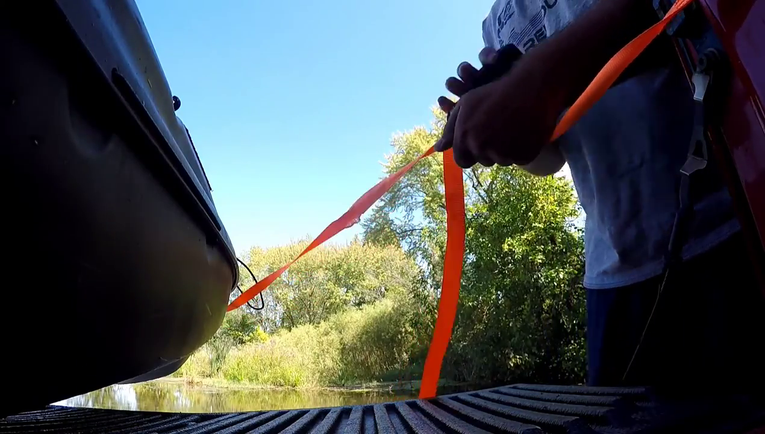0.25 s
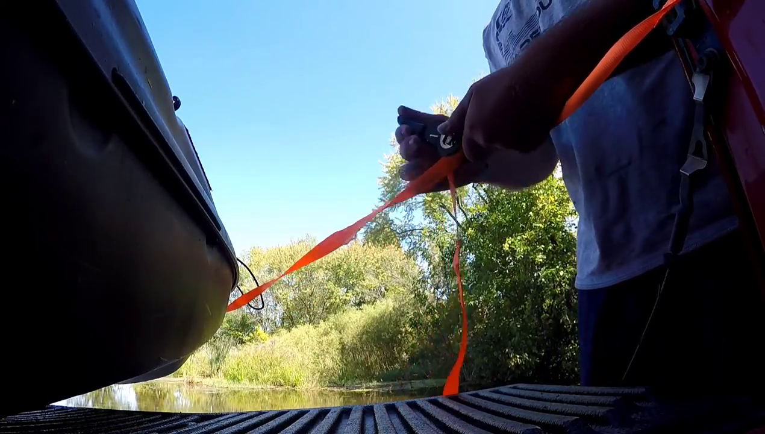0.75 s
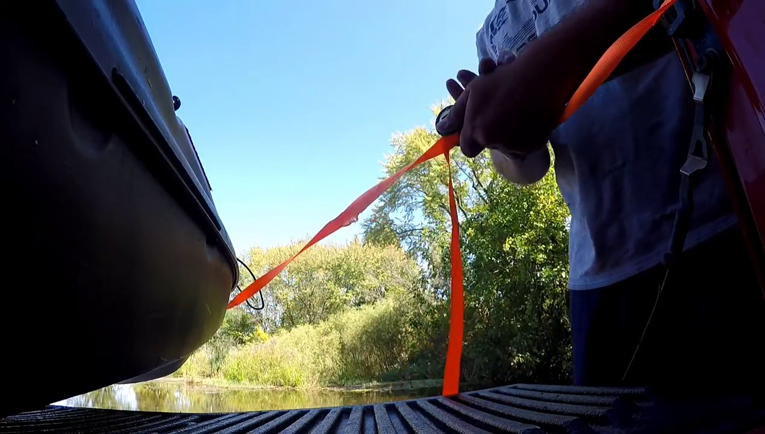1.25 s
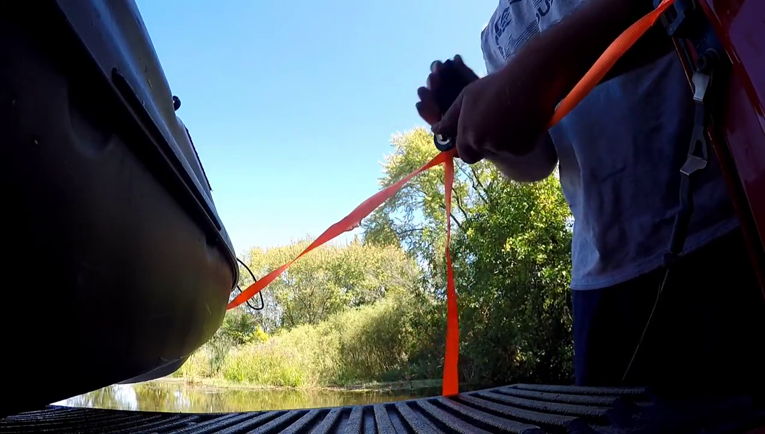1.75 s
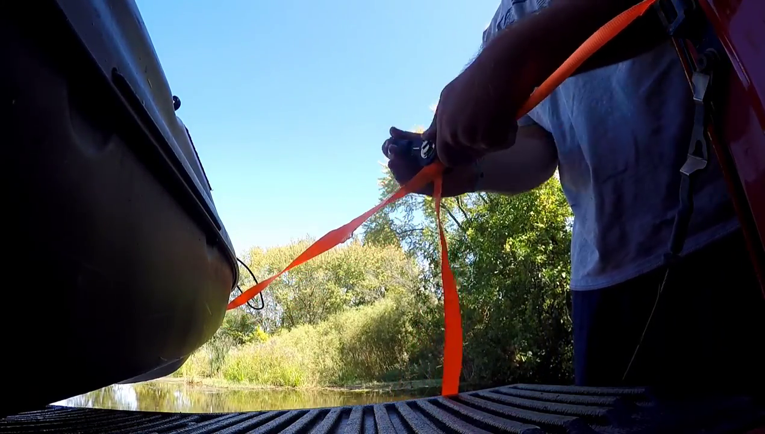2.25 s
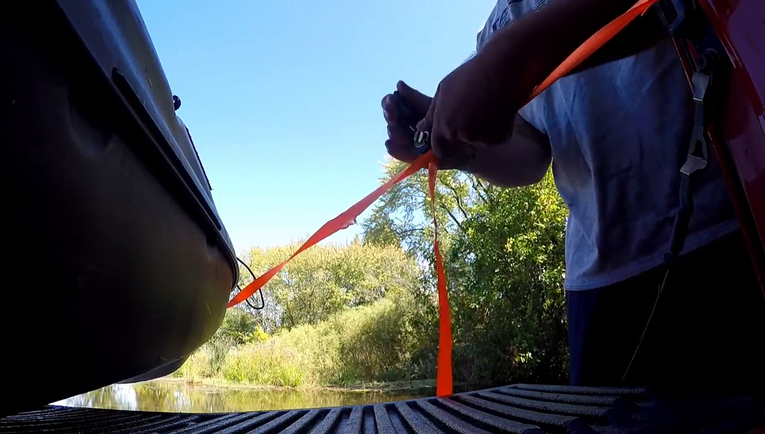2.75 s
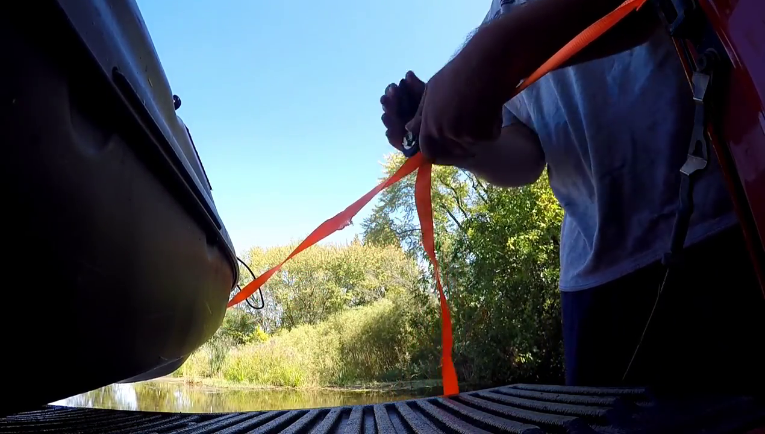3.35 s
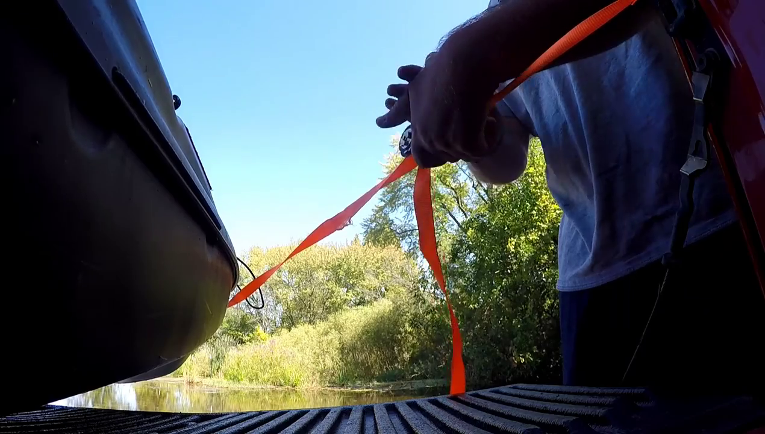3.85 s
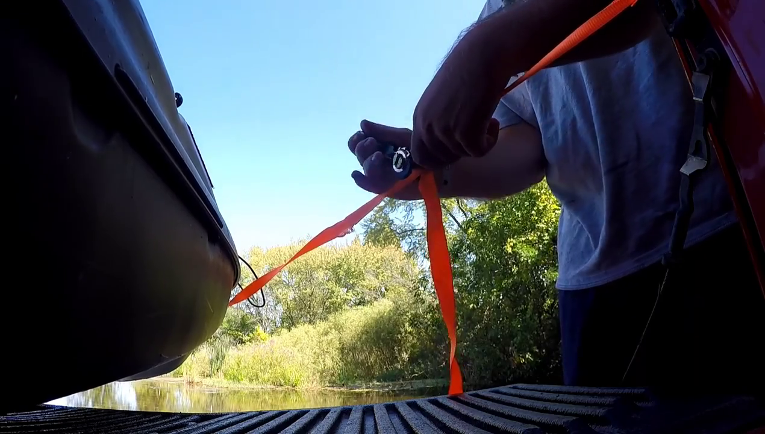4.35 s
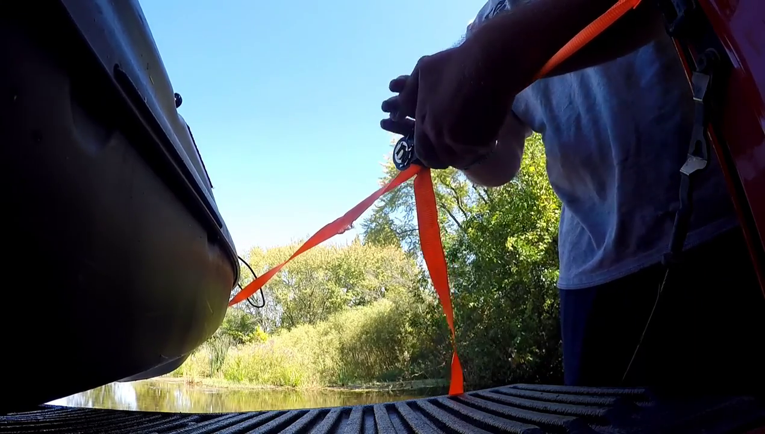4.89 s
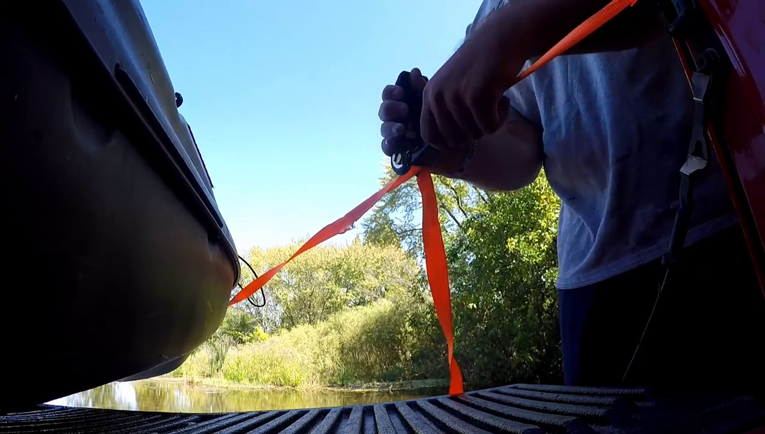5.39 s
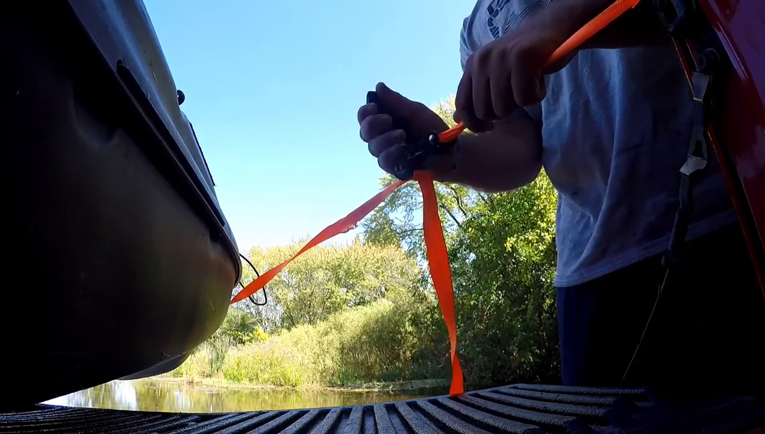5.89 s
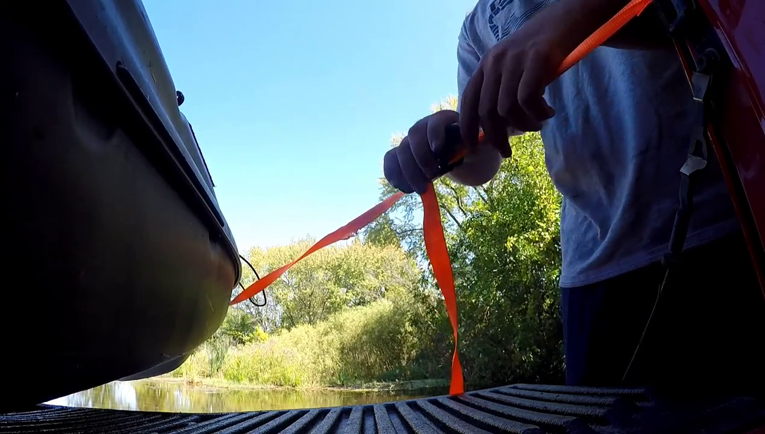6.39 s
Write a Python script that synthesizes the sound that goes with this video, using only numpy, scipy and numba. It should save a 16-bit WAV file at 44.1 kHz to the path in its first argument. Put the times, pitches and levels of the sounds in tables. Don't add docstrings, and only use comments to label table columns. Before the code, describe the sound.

A steel ratchet buckle is cranked in sharp paired and tripled clicks, with boomy knocks and webbing scrapes, over crickets, road hum and a distant truck.

```python
import sys
import numpy as np
from scipy import signal
from scipy.fft import rfft, irfft, next_fast_len
from scipy.io import wavfile
from scipy.ndimage import uniform_filter1d
from numba import njit

SR = 44100
rng = np.random.default_rng(int(sys.argv[2]) if len(sys.argv) > 2 else 0)


def convert_level_to_amplitude(level_db):
    exponent = np.asarray(level_db, float) / 20
    return 10 ** exponent


def inscribe(sig):
    pcm = np.round(np.clip(np.atleast_2d(sig).T, -1, 1) * 32767)
    wavfile.write(sys.argv[1], SR, pcm.astype(np.int16))


N = 292250
T = np.arange(N) / SR
M = next_fast_len(N, real=True)
F = np.maximum(np.arange(M // 2 + 1) * SR / M, 1)


def unit(x):
    return x / np.sqrt(np.mean(x ** 2))


def colour(points, hz):
    p = np.array(points, float)
    return np.interp(np.log(hz), np.log(p[:, 0]), p[:, 1])


def filtered(x, points):
    return unit(irfft(rfft(x, M) * convert_level_to_amplitude(colour(points, F)), M)[:N])


def band(hz, width):
    spectrum = rng.standard_normal(len(F)) + 1j * rng.standard_normal(len(F))
    return unit(irfft(spectrum / (1 + (2 * (F - hz) / width) ** 2), M)[:N])


def walk(rate):
    knots = np.repeat(rng.standard_normal(int(7 * rate) + 2), 16)
    smooth = uniform_filter1d(uniform_filter1d(knots, 16), 16)
    return 1.3 * np.interp(T * rate * 16, np.arange(len(smooth)), smooth)


def spaced(low_hz, ratio, count):
    return low_hz * ratio ** ((np.arange(count) + rng.random(count)) / count)


@njit
def modes(z, pole, size):
    y = np.zeros(size)
    for k in range(len(z)):
        v = z[k]
        for i in range(size):
            y[i] += v.imag
            v *= pole[k]
    return y


def ring(hz, db, t60, size, rise, scatter=0.94):
    start = convert_level_to_amplitude(db) * np.exp(2j * np.pi * scatter * rng.random(len(hz)))
    pole = np.exp((2j * np.pi * hz - np.log(1000) / t60) / SR)
    y = modes(start, pole, size) * (1 - np.exp(-np.arange(size) / (rise * SR)))
    return y / np.abs(y).max()


def add(track, s, y):
    i = max(int(s * SR), 0)
    track[i:i + len(y)] += y[:N - i]


# t/s, level/dB, loudest ring f/Hz, pawl touches early by t/ms, bed tug level/dB
PULLS = [(0.6543, -17.5, 4820, 2.6, -44), (.7102, -5, 5800, 9.2, -24.5), (.762, -4.5, 5020, 5.2, -20.5),
         (1.4182, -17, 5190, 3, -38), (1.481, -1.5, 6900, 9.8, -19.5), (1.5441, -4, 6670, 8.2, -19),
         (2.0763, -15, 5360, 2.9, -29.5), (2.129, -6.5, 6980, 14, -22), (2.1864, -6.5, 7700, 4, -20),
         (2.696, -17, 4980, 13, -29), (2.774, -6, 3800, 4, -17), (2.855, -9.5, 3570, 10.5, -19),
         (3.3228, -15.5, 6600, 2.6, -26.5), (3.4202, -4.5, 6940, 6.4, -19), (3.5139, -4, 7040, 7.5, -19.5),
         (4.023, -15.5, 3830, 3.4, -26.5), (4.1655, -5, 3040, 4.1, -17), (4.404, -6.5, 6460, 21, -18),
         (4.4646, -16, 5510, 0.56, -18), (5.1578, -22.5, 4770, 4.4, -31.5), (5.8979, -6.5, 7520, 25, -31)]
RETURNS = [(0.3265, -9, 5120, 2, -44), (0.4334, -20.5, 4700, 2, -35.5), (0.4525, -16, 5800, 2.9, -39),
           (1.1127, -1, 5770, 7.3, -35), (1.157, -3.5, 5060, 3, -42), (1.8198, -4, 6920, 4.8, -40),
           (1.8635, -3.5, 5160, 3, -25), (2.4385, -8.5, 4240, 3, -35), (2.4869, -2.5, 5400, 1.96, -28.5),
           (3.088, -5.5, 7000, 5, -28.5), (3.1314, -7, 6450, 2.3, -27), (3.763, -5, 4690, 3, -44),
           (3.8079, -1.5, 5140, 4.5, -26), (4.823, -5.5, 6570, 7.8, -29.5), (4.872, -3.5, 8490, 1.9, -21),
           (6.2624, -0.5, 6100, 1.8, -22.5), (6.361, -19, 3630, 1.4, -48), (6.39, -14, 5020, 2.6, -25)]
# t/s, level/dB, loudest ring f/Hz
TAPS = [(.1834, -27.5, 4320), (.3637, -29.5, 5700), (.775, -24, 4400), (1.0618, -35, 5900),
        (1.1413, -22, 5860), (1.4246, -23, 3810), (1.749, -31, 4550), (1.792, -27.5, 6600),
        (2.1745, -18, 8100), (2.3722, -24.5, 3600), (2.444, -11.5, 4410), (2.4715, -23, 2800),
        (2.7627, -16, 5760), (2.8596, -8.5, 4970), (3.0471, -35, 6000), (3.1159, -20, 3400),
        (3.403, -19.5, 5710), (3.4923, -17, 6630), (3.6605, -27, 3560), (3.7005, -27, 3700),
        (3.7077, -31, 3580), (3.7683, -17, 5000), (3.788, -29, 4400), (4.1447, -13.5, 4630),
        (4.6675, -33.5, 5800), (5.8875, -12.5, 6900), (6.0294, -31.5, 6530), (6.1317, -36, 4600),
        (6.179, -36, 3960), (6.28, -30, 4720)]


def snaps():
    touch_db, touch_hz, touch_dull_db = -11.5, 6330, -1
    teeth = PULLS + RETURNS
    touches = [(s - early_ms / 1000, db + touch_db, touch_hz, touch_dull_db)
               for s, db, _, early_ms, _ in teeth]
    return [(*row[:3], 0) for row in teeth] + touches + [(*row, 0) for row in TAPS]


# f/Hz, level/dB per Hz
PLATE = [(710, -42), (1200, -6), (2210, -11), (2980, 3), (4400, -0.5), (6870, 1), (7800, -2.5),
         (15500, -7.5)]


def buckle(count=90):
    out = np.zeros(N)
    for s, db, top_hz, edges_db in snaps():
        treble_db = -8.5 + 0.33 * (db + 10.5)
        bass_db = -5.0 - 0.17 * (db + 12.5)
        crowd = spaced(1200, 16000 / 1200, count)
        crowd_db = colour(PLATE, crowd) + 10 * np.log10(crowd / 5000) + 1.8 * rng.standard_normal(count)
        hz = np.r_[crowd, top_hz]
        gain_db = np.r_[crowd_db, 9.0]
        tilt_db = [bass_db + edges_db, 0, 0, treble_db + 6.5 + edges_db]
        gain_db += np.interp(hz, [3540, 4400, 6700, 7500], tilt_db)
        t60 = np.r_[.008 * (5000 / crowd) ** .3, .013]
        snap = ring(hz, gain_db, t60, size=900, rise=0.00034, scatter=0.7)
        add(out, s - .0002, convert_level_to_amplitude(db + 4.0) * snap)
    return out


# start t/s, length t/s, level/dB
DRAGS = [(0.183, 0.051, -66), (0.261, 0.095, -55.5), (.341, .042, -59), (0.512, 0.019, -53.5),
         (0.621, 0.031, -44.5), (1.026, .1, -47), (1.392, .036, -51), (1.716, 0.16, -48.5),
         (2.048, 0.022, -47.5), (2.363, 0.11, -46.5), (2.668, 0.028, -48), (3.01, 0.082, -43),
         (3.657, 0.2, -45), (4.357, .05, -41), (4.735, 0.071, -40), (5.111, .041, -48.5), (5.835, .09, -42),
         (6.227, 0.04, -45), (6.361, .025, -51)]


def drags():
    ride_db, ride_bright_db, ride_max_s, drag_bright_db = -41.5, -10.5, 0.054, -4
    s = np.array(RETURNS)[:, 0]
    rides = [(a + 0.0065, b - a - .008, ride_db, ride_bright_db)
             for a, b in zip(s[2:], s[3:]) if b - a < ride_max_s]
    return [(*row, drag_bright_db) for row in DRAGS] + rides


# t/s, length t/s, from f/Hz, to f/Hz, level/dB
SQUEAK = (5.99, .03, 4300, 5700, -49)


def squeak():
    _, length, from_hz, to_hz, db = SQUEAK
    u = np.arange(int(length * SR)) / (length * SR)
    hz = from_hz + (to_hz - from_hz) * u ** .5
    return convert_level_to_amplitude(db) * np.sin(np.pi * u) * np.sin(2 * np.pi * np.cumsum(hz) / SR)


def rubbing():
    ticks = rng.standard_normal(N) * convert_level_to_amplitude(2.26 * rng.exponential(size=N)) * (rng.random(N) < .017)
    dull = filtered(ticks, [(900, -3), (2000, -4.5), (3000, 0.5), (4000, -2), (6000, -37)])
    bright = filtered(ticks, [(3000, -32), (4600, 6.5), (6500, 4.5), (10000, -9.5), (15500, -24)])
    out = np.zeros(N)
    grip = convert_level_to_amplitude(1.1 * walk(120))
    for s, length, db, bright_db in drags():
        k = slice(int(s * SR), int((s + length) * SR))
        fade = signal.windows.tukey(k.stop - k.start, .3)
        out[k] += convert_level_to_amplitude(db - 0.5) * fade * grip[k] * (dull[k] + convert_level_to_amplitude(bright_db) * bright[k])
    add(out, SQUEAK[0], squeak())
    return out


# f/Hz, level/dB, decay t60/s
BED = [(181.6, 12, 0.51), (275, 3.5, 0.35), (433.8, 3.5, 0.18), (507.5, -2.5, 0.26), (614, -32, 0.22),
       (748.5, 0.5, 0.2), (905, -2, 0.18), (1018, 2.5, 0.2), (1349, 0.5, 0.13), (1710, -6, 0.13),
       (1777, -3, 0.13), (2000, -31, 0.18)]


def knock(boom_db, panel_hz, t60, count=130):
    bed_hz, bed_db, _ = np.array(BED).T
    crowd = spaced(300, 16, count)
    crowd_db = np.interp(np.log2(crowd / 330), [0, 2.7, 4], [-8, -16, -34])
    crowd_db += 11.0 / (1 + (np.log(crowd / panel_hz) / 0.073) ** 2)
    hz = np.r_[bed_hz * (1 + .012 * rng.standard_normal(len(BED))), 135, 200, 218, 250, crowd]
    db = np.r_[bed_db - 3.0, -4, 2, 10, 0, crowd_db] + 2.5 * rng.standard_normal(len(hz))
    low = hz < 320
    high = ~low
    size = int(1.5 * t60 * SR)
    boom = ring(hz[low], db[low], 2.0 * t60, size, rise=0.0024) * np.linspace(1, 0, size)
    panels = ring(hz[high], db[high], t60 * (600 / hz[high]) ** 0.31, size, rise=0.0011)
    return panels + convert_level_to_amplitude(boom_db) * boom


TENSION_S = [
    .7,
    2.8,
    4.3,
    5.8,
    6,
]
BOOM_DB = [-13.5, -2.5, 6, -2.5, 4]
PULL_PANEL_HZ = [488, 706, 1124, 1020, 900]


def tugs():
    late_s, return_panel_hz = 0.00304, 1234
    pulls = [(s + late_s, db, np.interp(s, TENSION_S, PULL_PANEL_HZ)) for s, *_, db in PULLS]
    returns = [(s, db, return_panel_hz) for s, *_, db in RETURNS]
    return [(s, db, np.interp(s, TENSION_S, BOOM_DB), hz) for s, db, hz in pulls + returns]


# t/s, level/dB, boom share level/dB
JUDDER = [
    (5.832, -31, 5),
    (5.844, -20, -15),
    (5.848, -6, -5.5),
    (5.862, -10.5, -1.5),
    (5.878, -17.5, -11),
    (5.888, -10, 0.5),
    (5.919, -11.5, -5.5),
    (5.945, -24.5, 5.5),
    (6.01, -37.5, 15),
]
HULL_HZ = [445, 910, 1710]


def bed():
    out = np.zeros(N)
    for s, db, boom_db, panel_hz in tugs():
        add(out, s, convert_level_to_amplitude(db) * knock(boom_db, panel_hz, 0.25))
    s, db, boom_db = np.transpose(JUDDER)
    for k, hit in enumerate(np.arange(5.832, 6.01, .006)):
        hit += 0.00467 * rng.random()
        blow = knock(np.interp(hit, s, boom_db), HULL_HZ[k % len(HULL_HZ)], 0.097)
        add(out, hit, convert_level_to_amplitude(np.interp(hit, s, db)) * blow)
    return out


def walls(x):
    t = np.arange(3500) / SR
    near = convert_level_to_amplitude(-22 - 60 * t / .018)
    far = convert_level_to_amplitude(-28.5 - 60 * (t - .007) / 0.011) + convert_level_to_amplitude(-38 - 60 * (t - .007) / 0.082)
    far /= 1 + np.exp(-(t - .0064) / 0.00088)
    place = 2 * np.pi * np.cumsum(4 + 2 * walk(5)) / SR
    paths = rng.standard_normal((3, len(t))) * (near + far)
    shares = np.cos(place + 2 * np.pi * np.arange(3)[:, None] / 3) * np.sqrt(2 / 3)
    return x + signal.oaconvolve(x * shares, paths, axes=1).sum(axis=0)[:N]


# t/s, engine cycle f/Hz
GEARS = [(0, 21.2), (.53, 21.4), (.83, 18.5), (1.15, 17.1), (1.7, 17.7), (2.7, 18.85), (3.4, 19.45),
         (4.35, 20.1), (4.75, 16.1), (5.1, 16.35), (6.63, 16.5)]
# t/s, level/dB
LOAD = [(0, -53), (.5, -43.5), (.83, -35), (1, -35.5), (1.6, -29.5), (2.4, -28.5), (3.4, -24), (3.8, -25.5),
        (4.15, -28.5), (4.75, -32), (5, -33), (5.5, -28), (6.2, -28.5), (6.63, -34.5)]
# multiple of the cycle, level/dB
EXHAUST = [(2, -3), (3, -2), (4, 2), (5, -1.5), (6, -30), (7, -6), (8, -30), (9, -1), (10, -14), (11, -11),
           (12, -12.5), (13, -22), (14, -18.5), (15, -27)]
# t/s, spread t/s, lift level/dB
LUGS = [
    (.8, 0.1, 27),
    (2.6, 1.13, 11.7),
    (4.13, 0.096, 19.7),
    (4.7, 0.29, 16),
]


def truck():
    cycle_hz = np.interp(T, *np.transpose(GEARS))
    bark_hz, bark_width_hz, bark_db, off_bark_db = 163, 14, 5, -10
    near_bark = np.exp(-((9 * cycle_hz - bark_hz) / bark_width_hz) ** 4)
    ninth_db = off_bark_db + (bark_db - off_bark_db) * near_bark
    third_db = -11 + sum(db * np.exp(-((T - s) / spread) ** 2) for s, spread, db in LUGS)
    turns = 2 * np.pi * np.cumsum(cycle_hz * (1 + 0.0031 * walk(6.03))) / SR
    stack = np.zeros(N)
    for k, db in EXHAUST:
        swell_db = (3.5 - 2.17 * (k == 9)) * walk(3.03)
        order_db = db + ninth_db * (k == 9) + third_db * (k == 3) + swell_db
        stack += convert_level_to_amplitude(order_db) * np.cos(k * turns + .5 * walk(1.94))
    return stack * convert_level_to_amplitude(np.interp(T, *np.transpose(LOAD)) - 3.5)


# f/Hz, level/dB per Hz
ROAD = [(22, -16), (70, 2.5), (190, -7), (330, -25.5), (1300, -25), (2500, -50.5), (4400, -39.5),
        (16000, -56)]


def road():
    swell = walk(0.52)
    hum = np.zeros(N)
    for hz in 22 * 2 ** np.arange(0, 9.6, .5):
        db = colour(ROAD, hz) + 10 * np.log10(hz) + 1.2 * swell + 1.33 * walk(7.2)
        hum += convert_level_to_amplitude(db) * band(hz, hz * 0.49)
    return unit(hum) * convert_level_to_amplitude(-32.0)


# song f/Hz, width f/Hz, pulse rate f/Hz, pulse depth 0-1, early level/dB, late level/dB
CRICKETS = [
    (3850, 220, 65.2, .7, -63, -62.5),
    (6640, 260, 41.8, .75, -54.5, -61),
    (6900, 1900, 118, .2, -63, -58.5),
    (7900, 900, 138, .3, -72, -68),
    (5820, 100, 90, .3, -78, -73),
    (8720, 150, 120, .3, -74, -74),
]


def crickets():
    out = np.zeros(N)
    for hz, width, rate, depth, *db in CRICKETS:
        stroke = 2 * np.pi * np.cumsum(rate * (1 + 0.0099 * walk(3.12))) / SR
        pulse = 1 - np.clip(depth, 0, 1) * (1 - np.maximum(np.sin(stroke), 0))
        level_db = np.interp(T, [.8, 4.5], db) + 1.3 * walk(2.2)
        out += convert_level_to_amplitude(level_db) * unit(pulse * band(hz, width))
    return out


def scene():
    mono = walls(buckle() + rubbing()) + bed() + truck() + road() + crickets()
    return np.array([mono, mono])


def smear(x, db, spread_s):
    t = np.arange(-500, 501) / SR
    kernel = rng.standard_normal(len(t)) * np.exp(t / spread_s) * (t < 0)
    treble = signal.sosfilt(signal.butter(8, 4200, "high", fs=SR, output="sos"), x)
    return convert_level_to_amplitude(db) * signal.oaconvolve(treble, kernel / np.linalg.norm(kernel), "same")


def band_limit(x):
    return signal.sosfilt(signal.butter(12, 16480, fs=SR, output="sos"), x)


def record(dry):
    moments = np.repeat(1. * (rng.random(N // 1024 + 1) < .35), 1024)[:N]
    apart = uniform_filter1d(moments, 128) + convert_level_to_amplitude(-30)
    side = apart * smear(dry[0], db=-11.5, spread_s=.003)
    hazy = dry + smear(dry[0], db=-6.5, spread_s=0.0023) + np.array([side, -side])
    soft = np.tanh(1.15 * hazy) / 1.15
    low_pass = signal.ellip(8, .2, 75, 15300, fs=SR, output="sos")
    return band_limit(signal.sosfilt(low_pass, soft))


dry = scene()
out = record(dry)
inscribe(out)
```